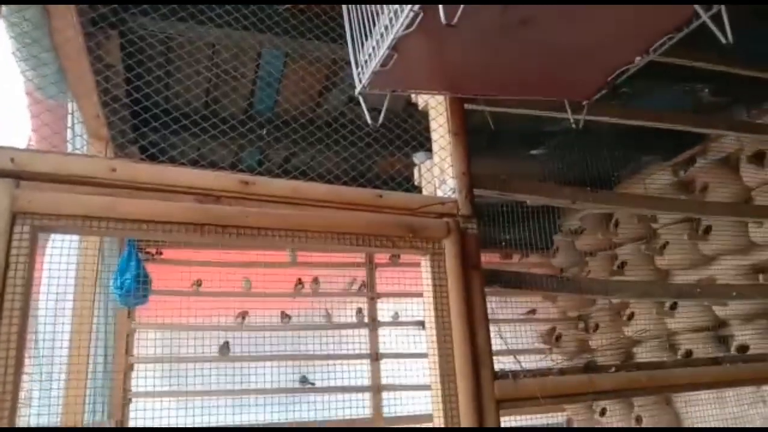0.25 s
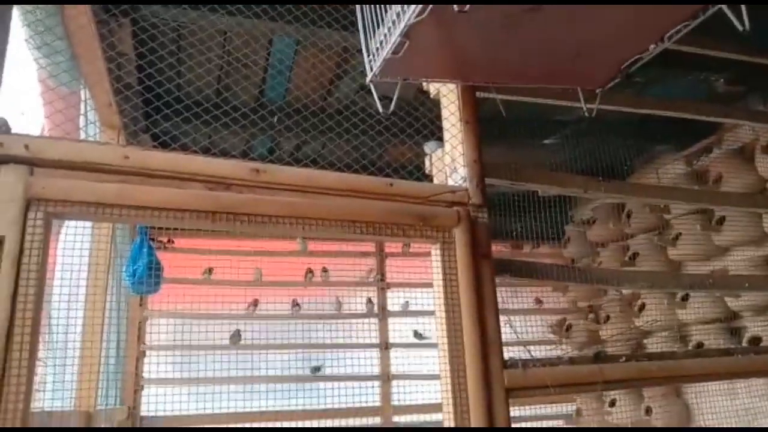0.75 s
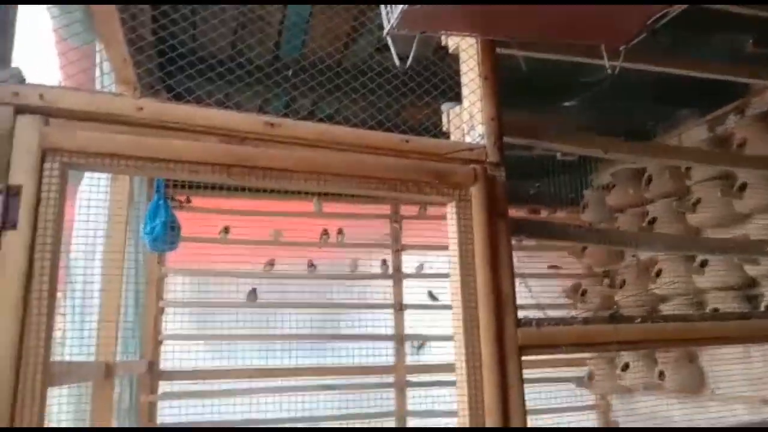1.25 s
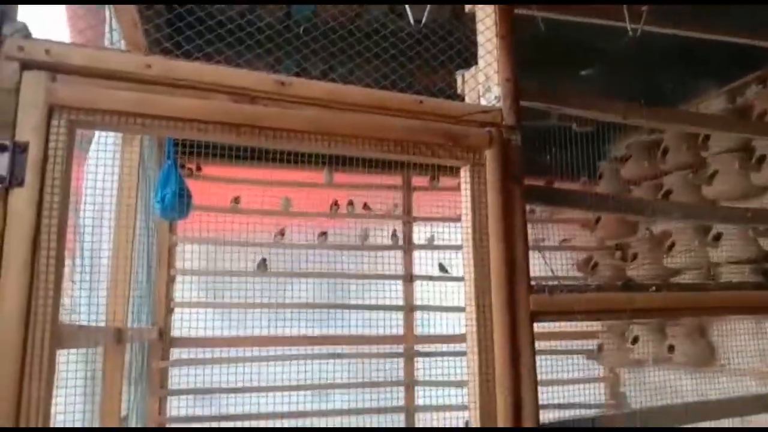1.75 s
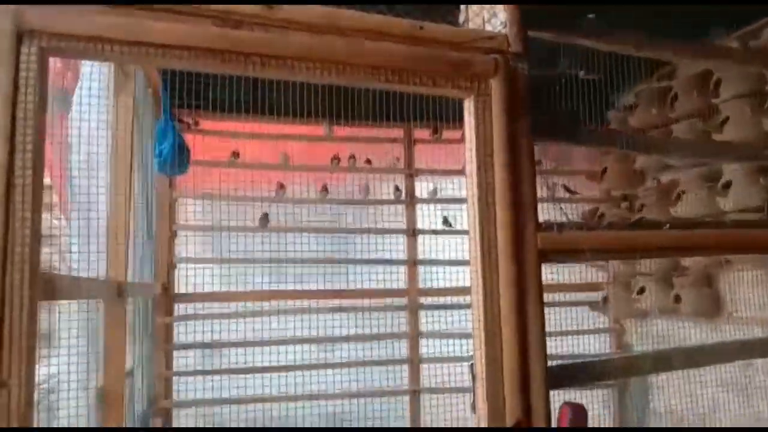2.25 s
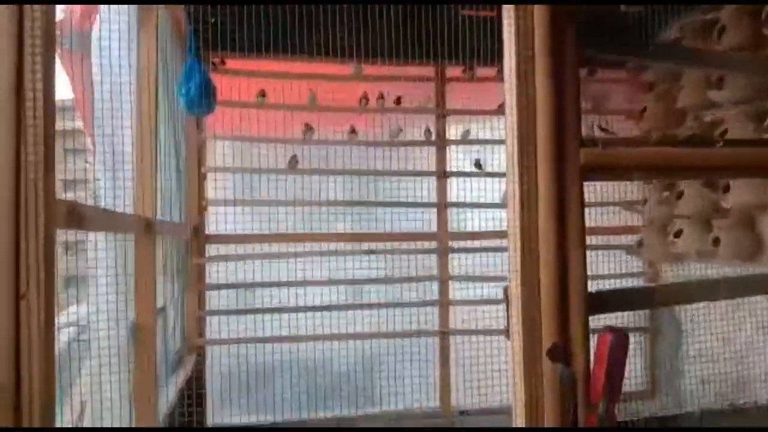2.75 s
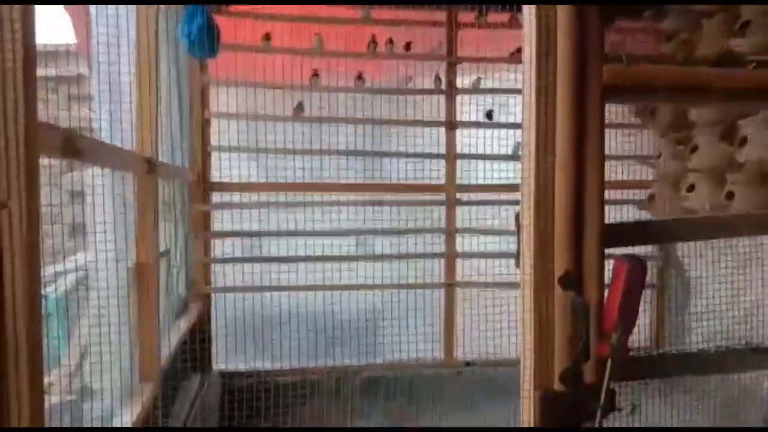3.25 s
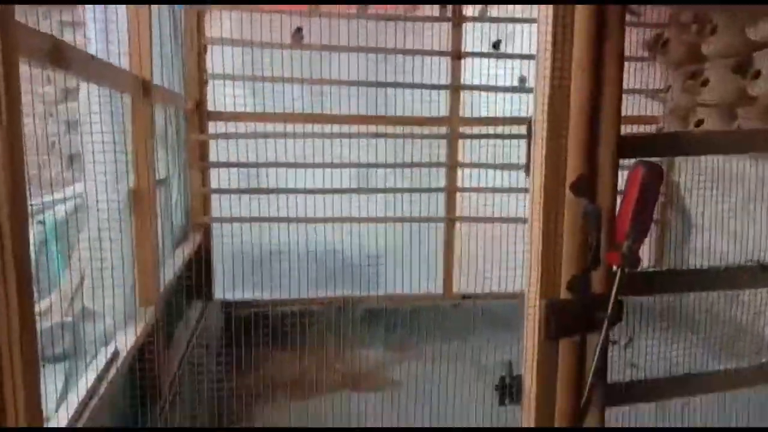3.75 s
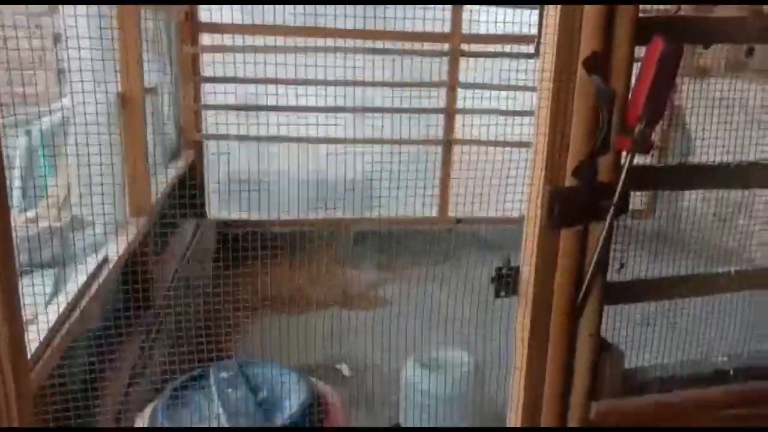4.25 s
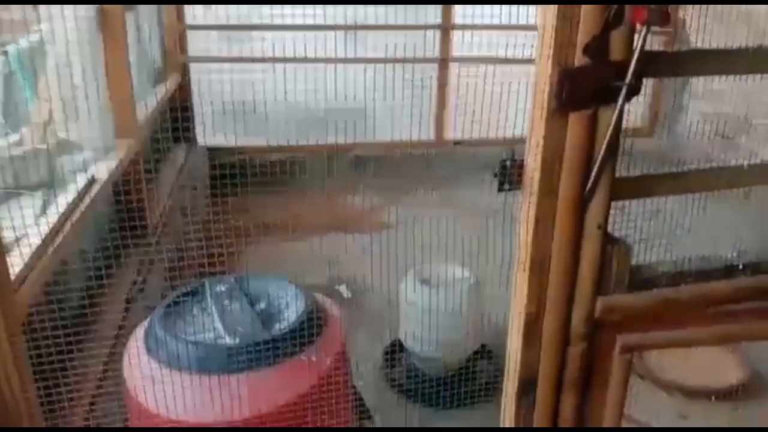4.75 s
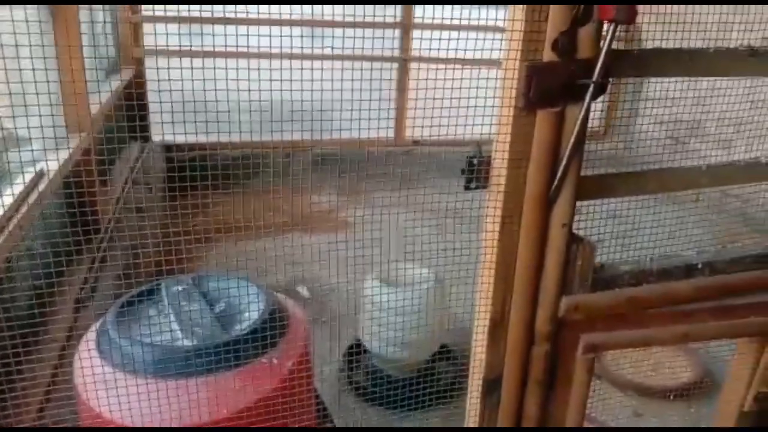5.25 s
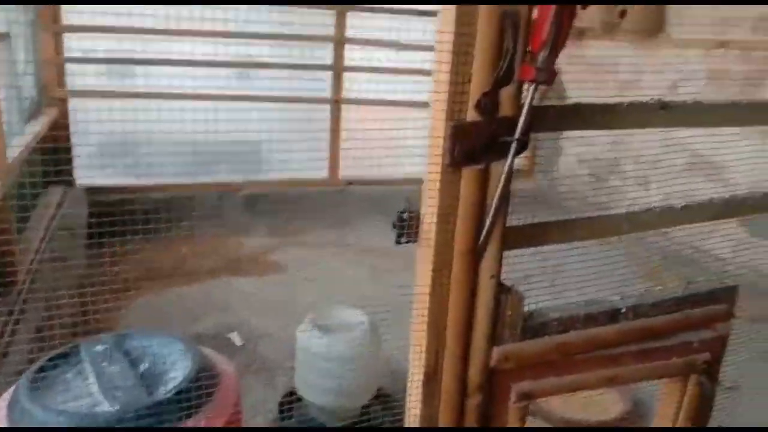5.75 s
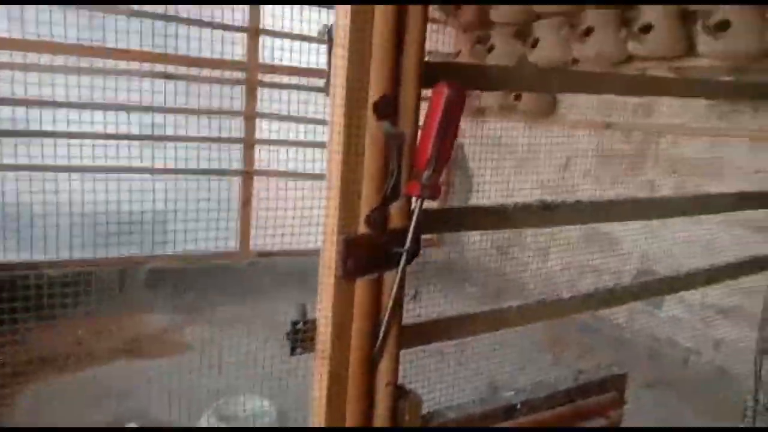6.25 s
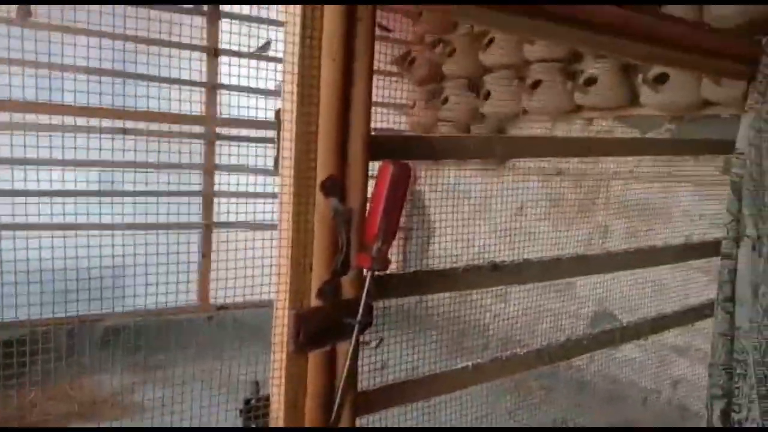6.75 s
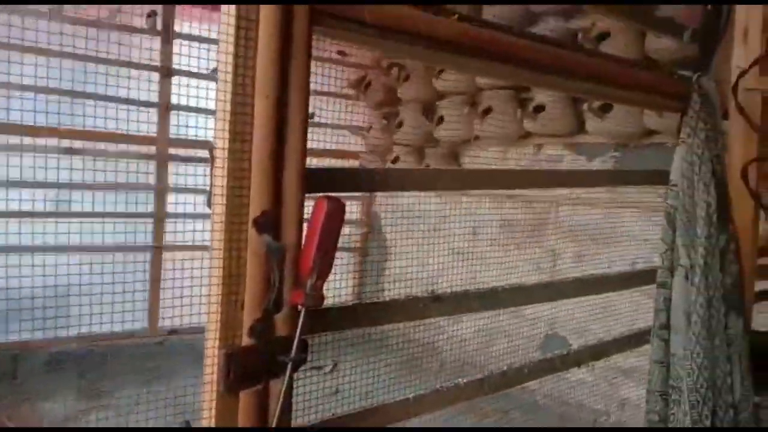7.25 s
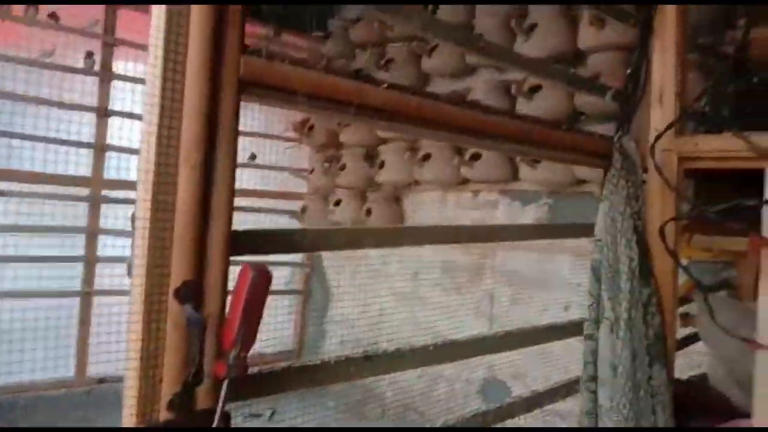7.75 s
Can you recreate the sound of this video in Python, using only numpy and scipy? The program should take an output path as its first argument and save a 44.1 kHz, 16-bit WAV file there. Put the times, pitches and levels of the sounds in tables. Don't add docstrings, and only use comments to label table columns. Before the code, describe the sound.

A flock of small finches calls in a wood-and-wire aviary. Short nasal peeps and rasping chirps come from farther perches, with tiny claw ticks on mesh. After a quiet lull around three to four seconds, nearer birds burst in with loud rasps, arched whistles and clear beeps, staying busy to the end. Low lumpy traffic and building hum lie underneath, heard through a small handheld microphone that thins the treble between calls.

```python
import sys
import numpy as np
from scipy import signal
from scipy.fft import rfft, irfft, next_fast_len
from scipy.io import wavfile
from scipy.ndimage import uniform_filter1d, map_coordinates

SR = 44100
rng = np.random.default_rng(int(sys.argv[2]) if len(sys.argv) > 2 else 0)


def gain_from_db(level_db):
    decades = np.asarray(level_db, float) / 20
    return 10 ** decades


def wav_out(sig):
    wavfile.write(sys.argv[1], SR, np.round(np.clip(np.atleast_2d(sig).T, -1, 1) * 32767).astype(np.int16))


N = 353241


def unit(x):
    return x / np.sqrt(np.mean(x ** 2) + 1e-20)


def along(points, hz):
    f, v = np.transpose(points)
    return np.interp(np.log(hz + 1), np.log(f + 1), v)


def curves(rows):
    s, *cols = np.transpose(rows)
    return [np.interp(np.arange(N) / SR, s, c) for c in cols]


def wobble(rate_hz, size=N):
    knots = rng.standard_normal(int(size * rate_hz / SR) + 4)
    return map_coordinates(knots, [np.arange(size) * rate_hz / SR])


def filtered(x, response):
    m = next_fast_len(x.shape[-1] + 4096)
    return irfft(rfft(x, m) * response(np.fft.rfftfreq(m, 1 / SR)), m)[..., :x.shape[-1]]


def add(track, s, sound):
    start = max(round(s * SR), 0)
    track[start:start + len(sound)] += sound[:len(track) - start]


def patches(x, patchy_db):
    z = signal.stft(x, nperseg=2048)[2]
    field = uniform_filter1d(uniform_filter1d(rng.standard_normal(z.shape), 3, 0), 4, 1)
    return signal.istft(z * gain_from_db(patchy_db * unit(field)), nperseg=2048)[1][:N]


def rush(spectrum, patchy_db):
    x = patches(rng.standard_normal(N), patchy_db)
    return unit(filtered(x, lambda hz: gain_from_db(along([(15, -120)] + spectrum + [(22000, -120)], hz))))


def beak(hz, centre_hz, octaves, skirt_db):
    hump = np.exp(-.5 * (np.log2((hz + 1) / centre_hz) / octaves) ** 2)
    bass_shut = 1 + (1600 / (hz + 1)) ** 6
    top_shut = 1 + (hz / 7000) ** 3.3
    return hump + gain_from_db(skirt_db) / bass_shut / top_shut


def voiced(pitch_hz, centre_hz, octaves, skirt_db, jitter, rough, flicker_db=2.7):
    size = len(pitch_hz)
    order = np.arange(1, 13500 // pitch_hz.max())[:, None]
    cycles = np.cumsum(pitch_hz * (1 + jitter * wobble(149.96, size=size))) / SR
    total = len(order) * size
    knots = gain_from_db(flicker_db * rng.standard_normal(total // 700 + 2))
    flicker = np.interp(np.arange(total) / 700, np.arange(len(knots)), knots).reshape(-1, size)
    strength = beak(order * pitch_hz.mean(), centre_hz, octaves, skirt_db) * flicker
    phase = order * cycles + rng.random(order.shape)
    stack = np.sum(strength * np.sin(2 * np.pi * phase), axis=0)
    return unit(stack * (1 + rough * wobble(850, size=size)) / np.sqrt(1 + rough ** 2))


# t/s, traffic level/dB, building hum level/dB
TOWN_LEVELS = [(0.0, -58, -66), (0.15, -70, -60), (0.24, -50.5, -60), (0.27, -58, -60.5),
               (2.54, -57.5, -58.5), (2.76, -49, -58.5), (2.92, -57.5, -57), (3.4, -56.5, -57.5),
               (3.6, -56.5, -54), (4.77, -62, -62), (4.86, -48, -63), (4.9, -57.5, -59), (6.15, -51.5, -61),
               (6.21, -53, -64), (6.37, -66, -62.5), (6.46, -51.5, -57.5), (7.31, -59, -58),
               (8.0, -57.5, -55)]
# t/s, level/dB
CHORUS_LEVELS = [
    (0, -86.5),
    (.33, -78),
    (3.76, -89.5),
    (4.7, -82.5),
    (5.03, -63.5),
    (5.46, -79),
    (6.4, -74.5),
    (7.1, -76),
    (8, -71.5),
]
# t/s, level over the hiss base/dB
HISS_LEVELS = [
    (0, 4),
    (.7, 8),
    (1.3, 5),
    (2.3, 6),
    (2.9, 2),
    (4.6, 2),
    (5.2, 0.5),
    (7, 2.5),
    (8, 1),
]
# f/Hz, density/dB per Hz
TRAFFIC_SPECTRUM = [(30, -23), (60, -15), (100, 5.5), (140, 5), (185, -7.5), (300, -26)]
HUM_SPECTRUM = [(150, -29.5), (232, 0), (300, -11), (450, -12.5), (650, -20), (1000, -52)]
DRONE_SPECTRUM = [(500, -27.5), (800, -10.5), (1130, -9), (1260, -6), (1400, -12.5), (1900, -17),
                  (2600, -20.5), (4000, -51)]
CHORUS_SPECTRUM = [(1500, -18), (2500, 7.5), (4000, 6.5), (7000, 15.5), (9000, 5), (12000, -9)]
SELF_SPECTRUM = [(8000, -4), (10000, -3.5), (15500, -11.5)]
DRONE_DB, DRONE_FOLLOWS = -62, 0.25
SELF_DB = -66


def town():
    traffic_db, hum_db = curves(TOWN_LEVELS)
    chorus_db, = curves(CHORUS_LEVELS)
    hiss_db, = curves(HISS_LEVELS)
    drone_db = DRONE_DB + DRONE_FOLLOWS * (chorus_db - chorus_db.mean())
    traffic = gain_from_db(traffic_db + 2.1 * wobble(17)) * rush(TRAFFIC_SPECTRUM, patchy_db=3.1)
    hum = gain_from_db(hum_db) * rush(HUM_SPECTRUM, patchy_db=4.2)
    drone = gain_from_db(drone_db - 3 + 2.6 * wobble(22)) * rush(DRONE_SPECTRUM, patchy_db=3.6)
    hiss = gain_from_db(SELF_DB + hiss_db + 1.2 * wobble(11)) * rush(SELF_SPECTRUM, patchy_db=7.0)
    chorus = gain_from_db(chorus_db + 19 + 2.6 * wobble(9)) * rush(CHORUS_SPECTRUM, patchy_db=4.5)
    return traffic + hum + drone + hiss + chorus


# t/s, length/s, first f/Hz, last f/Hz, level/dB
LOW_NOTES = [(0.204, .12, 523, 596, -46), (0.293, 0.072, 506, 530.6, -47), (0.63, 0.099, 518, 555, -48.5),
             (1.091, 0.097, 508, 476, -63), (1.235, 0.06, 482, 459, -57), (1.511, 0.043, 499, 478, -60),
             (1.879, 0.074, 514, 491, -53.5), (1.944, 0.083, 519, 523, -54),
             (4.056, 0.08, 494.6, 507, -58.5), (4.428, 0.061, 516, 524, -54), (5.712, 0.095, 469, 511, -59),
             (5.749, 0.0473, 532, 543, -54), (5.795, .13, 513.6, 484, -49.5),
             (6.69, 0.071, 540, 528, -48.5), (7.055, 0.024, 498, 503, -58.5), (7.957, 0.073, 457, 465, -54),
             (3.845, 0.076, 544, 510, -62)]
HIGH_NOTES = [(0, 0.042, 623, 610, -55.5), (0.054, 0.092, 604, 570, -51.5), (0.146, 0.096, 611, 592, -51.5),
              (0.911, 0.064, 564, 577, -59), (1.393, 0.15, 571, 543, -68), (1.608, 0.03, 567, 569, -52.5),
              (1.824, 0.049, 603, 564, -70), (2.446, 0.069, 561, 485.6, -50), (4.077, 0.1, 586, 547, -54.5),
              (4.214, 0.13, 721, 558, -47.5), (4.576, 0.072, 587, 550, -55.5),
              (5.345, 0.099, 591, 625, -48.5), (5.432, 0.065, 567, 542, -56),
              (6.227, 0.091, 617, 593, -50.5), (6.419, 0.052, 635, 680, -54.5),
              (6.93, 0.073, 564, 544, -55), (7.114, 0.061, 687, 716, -51.5), (7.236, 0.04, 574, 572, -52),
              (7.508, 0.058, 588, 537, -50.5), (7.613, 0.081, 569, 514, -54)]
# t/s, length/s, first f/Hz, last f/Hz, level/dB
RISERS = [
    (4.765, .045, 1066, 1194, -46.5),
    (4.926, 0.051, 1060, 1188, -43.5),
    (6.615, 0.0578, 587, 602, -53),
]
# t/s, length/s, f/Hz, level/dB,
# strongest partial
FLAT_NOTES = [(0.469, 0.141, 560, -63.5, 2.26), (0.509, 0.113, 712, -71, 0.74), (1.23, 0.064, 702, -63, 0.48),
              (3.132, 0.067, 495.5, -59, 4.8), (3.378, 0.066, 439, -65, 3.6), (3.581, 0.0843, 483, -61, 4.5),
              (4.8, 0.06, 990, -61.5, 11), (5.005, 0.06, 574, -47, 4), (0.079, 0.147, 599, -68.5, 1.5),
              (1.835, 0.031, 590, -54, 11), (7.84, 0.09, 650, -62, 1.2), (5.3, 0.0443, 720, -44, 6.3),
              (6.05, 0.0475, 570, -51, 4.9), (6.2, .022, 560, -45, 8.4), (7.895, 0.06, 540, -48, 5.8),
              (7.2, 0.069, 1200, -63, 1.43), (2.785, 0.035, 1290, -68, 0.8), (7.74, 0.05, 540, -55.5, 4),
              (4.31, 0.017, 1300, -57.5, 0.89)]
LOW_PARTIAL, HIGH_PARTIAL, RISER_PARTIAL = 6.41, 5.5, 3.56
FLAT_SAG = 0.0309


def stacks():
    out = np.zeros(N)
    notes = [(*row, LOW_PARTIAL) for row in LOW_NOTES]
    notes += [(*row, HIGH_PARTIAL) for row in HIGH_NOTES]
    notes += [(*row, RISER_PARTIAL) for row in RISERS]
    for s, length, hz, db, partial in FLAT_NOTES:
        notes.append((s, length, hz, hz * (1 - FLAT_SAG), db, partial))
    for s, length, first_hz, last_hz, db, partial in notes:
        beak_hz = partial * (first_hz + last_hz) / 2
        u = np.linspace(0, 1.25, round(1.25 * length * SR))
        glide_hz = first_hz + (last_hz - first_hz) * u
        pitch_hz = glide_hz * (1 - 0.044 * np.exp(-u / 0.083) - 0.0145 * u ** 4)
        swell = np.abs(np.sin(np.pi * (u / 1.144) ** 0.8)) ** 1.3
        voice = voiced(pitch_hz, beak_hz, octaves=.6, skirt_db=-24, jitter=.006, rough=.32, flicker_db=4.6)
        add(out, s, gain_from_db(db + 6.0) * swell * voice)
    return out


DISTANT_COUNT, DISTANT_DB, DISTANT_BEAK_HZ = 44, -67, 1500


def distant():
    out = np.zeros(N)
    for when, long, pitch, glide, loud in rng.random((DISTANT_COUNT, 5)):
        u = np.linspace(0, 1, round((.04 + .08 * long) * SR))
        pitch_hz = (430 + 250 * pitch) * (1 + (.24 * glide - .12) * u)
        voice = voiced(pitch_hz, DISTANT_BEAK_HZ, octaves=.3, skirt_db=-30, jitter=.008, rough=.4,
                       flicker_db=5)
        add(out, when * N / SR, gain_from_db(DISTANT_DB + 8 * loud) * np.sin(np.pi * u) * voice)
    return out


# peak t/s, rise/s, fall/s, level/dB
FAR_RASPS = [(0.144, 0.049, 0.07, -47.5), (0.26, 0.04, 0.094, -49), (.357, 0.032, 0.03, -44),
             (.581, 0.019, 0.043, -40.5), (0.796, 0.032, 0.015, -41), (.947, 0.071, 0.022, -44),
             (1.395, 0.082, 0.056, -45.5), (1.546, 0.051, 0.016, -44), (1.607, 0.024, 0.078, -51.5),
             (1.741, 0.015, 0.036, -45), (1.868, 0.021, 0.058, -41.5), (2.007, .023, 0.022, -35.5),
             (2.16, 0.029, 0.013, -32), (2.341, 0.021, 0.014, -34.5), (2.449, 0.0053, 0.019, -45.5),
             (2.48, 0.024, 0.04, -41.5), (2.798, 0.011, 0.021, -71), (2.932, 0.02, 0.011, -60),
             (3.199, 0.017, 0.017, -79), (3.542, 0.015, 0.072, -50.5), (3.759, .044, 0.027, -55),
             (4.349, 0.038, 0.01, -46.5), (4.467, 0.06, 0.016, -48.5), (4.579, 0.012, 0.016, -47),
             (4.664, 0.027, 0.021, -47), (5.345, 0.093, 0.038, -38.5), (6.676, 0.025, 0.025, -37.5),
             (6.887, 0.021, 0.06, -35), (7.609, 0.048, 0.066, -40.5), (7.951, 0.04, 0.13, -62)]
# peak t/s, rise/s, fall/s, level/dB, beak f/Hz
NEAR_RASPS = [(4.813, 0.018, 0.035, -28, 4660), (4.859, 0.033, 0.018, -34, 4150),
              (4.975, 0.023, 0.033, -26, 5030), (5.053, 0.023, 0.027, -30, 4230),
              (5.132, 0.0082, 0.013, -29, 4700), (5.172, 0.0074, 0.046, -31, 3970),
              (5.504, 0.016, 0.053, -38.5, 4460), (5.619, 0.0083, 0.012, -33.5, 4970),
              (5.67, 0.037, .023, -34, 5050), (5.772, 0.026, 0.017, -47, 4000),
              (5.974, 0.032, 0.053, -37.5, 4260), (5.999, 0.03, 0.071, -40.5, 3300),
              (6.123, 0.01, 0.022, -34.5, 4830), (6.197, 0.03, 0.061, -29.5, 4730),
              (6.438, 0.029, 0.022, -43, 4250), (6.571, .036, 0.028, -34.5, 4620),
              (7.061, 0.019, 0.024, -47, 4700), (7.135, 0.011, 0.095, -36.5, 4800),
              (7.258, 0.061, 0.011, -41, 4530), (7.358, 0.031, 0.057, -40, 4300),
              (7.501, 0.02, 0.017, -34, 4930), (7.745, 0.048, 0.033, -36.5, 5030),
              (7.867, 0.029, 0.037, -34, 4820)]
# peak t/s, rise/s, fall/s, level/dB, beak f/Hz
SQUEAKS = [
    (0.458, .005, .025, -56, 6840),
    (1.071, 0.017, 0.073, -56, 5770),
    (1.696, 0.011, .033, -47, 5700),
    (2.125, 0.0064, .007, -42, 5100),
    (2.243, 0.021, .043, -45, 6100),
    (2.699, .052, 0.038, -61, 5960),
    (2.81, .015, .02, -60, 5950),
    (3.545, .015, 0.028, -46, 7100),
    (4.773, .004, 0.012, -36, 5250),
]
FAR_BEAK_HZ, NEAR_OCTAVES, SQUEAK_OCTAVES = 3740, 0.31, 0.17
FAR_OCTAVES, NARROWS = 0.78, 0.03


def rasps():
    out = np.zeros(N)
    calls = []
    for row in FAR_RASPS:
        octaves = FAR_OCTAVES * np.clip(1 - NARROWS * (row[3] + 45), .5, 1.3)
        calls.append((*row, FAR_BEAK_HZ, octaves))
    calls += [(*row, NEAR_OCTAVES) for row in NEAR_RASPS]
    calls += [(*row, SQUEAK_OCTAVES) for row in SQUEAKS]
    for s, rise, fall, db, beak_hz, octaves in calls:
        t = np.arange(-round(1.8 * rise * SR), round(3 * fall * SR)) / SR
        pitch_hz = rng.uniform(500, 900) * (1 - .8 * t)
        shaky = voiced(pitch_hz, beak_hz, 1.2 * octaves, skirt_db=-20, jitter=.022, rough=.55)
        flow = gain_from_db(0.56 * wobble(506, size=len(t))) * rng.standard_normal(len(t))
        hoarse = unit(filtered(flow, lambda hz: beak(hz, beak_hz, octaves, skirt_db=-16)))
        voice = gain_from_db(-1.2) * shaky + gain_from_db(-7) * hoarse
        swell = gain_from_db(-9 * np.where(t < 0, np.abs(t / rise) ** 1.7, np.abs(t / fall) ** 1.38))
        add(out, s + t[0], gain_from_db(db - 0.5) * swell * voice)
    return out


# t/s, peak level/dB, frame knock level/dB, mesh rattle level/dB
TICKS = [(0.452, -74, -14, 15.5), (0.497, -79.5, -18, 17), (0.572, -77, -4, 14), (0.6567, -65, -9, -4),
         (1.063, -69.5, -1, 7), (1.11, -71, -4, -11), (1.5972, -66.5, 5, 9.5), (1.695, -57, 4, -2),
         (1.7342, -51.5, -9, -14), (1.771, -51.5, -7, -3), (2.0804, -67.5, 4, 1), (2.122, -71.5, 16, 13.5),
         (2.16, -60.5, 7, 3.5), (2.2379, -57, -3.5, -7), (2.2796, -61, 5.5, -11), (2.5572, -72.5, -14, 5.5),
         (2.445, -79, 13, 4), (1.905, -74, -5, 2), (2.958, -85, 15, 18), (2.991, -60.5, 8, 6.5),
         (3.52, -76, 12, 7), (2.793, -82, 7, 12), (3.9823, -85.5, -7, 10.5), (4.042, -90.5, -11, 15.5),
         (4.571, -69, 2, 1), (5.225, -69, -2, 9), (4.896, -74, -5, 9)]
WIRE_HZ = [5700, 6200, 7130]
WIRE_DB = -2


def ticks():
    out = np.zeros(N)
    t = np.arange(SR // 8) / SR
    for s, db, knock_db, rattle_db in TICKS:
        a, b, c = rng.standard_normal((3, len(t))) * gain_from_db(2.3 * wobble(335, size=len(t)))
        snap = unit(filtered(a, lambda hz: beak(hz, 8600, 0.59, skirt_db=-30)))
        snap *= gain_from_db(22.5 - 60 * t / 0.078)
        rattle = unit(filtered(b, lambda hz: beak(hz, 7300, 0.28, skirt_db=-51.0)))
        rattle *= gain_from_db(rattle_db + 21.0 - 60 * t / 0.091)
        ring = np.sin(2 * np.pi * np.outer(WIRE_HZ, t)).T @ gain_from_db(rng.normal(0, 5.5, len(WIRE_HZ)))
        rattle += ring * gain_from_db(rattle_db + 13.5 + WIRE_DB - 60 * t / 0.045)
        knock = unit(filtered(c, lambda hz: beak(hz, 1520, 0.83, skirt_db=-57)))
        knock *= gain_from_db(knock_db + 7.0 - 60 * t / 0.11)
        onset = 1 - np.exp(-t / .0006)
        add(out, s, gain_from_db(db) * (snap + rattle + knock) * onset)
    return out


# t/s, length/s, top f/Hz, level/dB, strongest partial
ARCHES = [(0.803, 0.076, 1110, -53.5, 2.45), (1.297, 0.0626, 1041, -47, 3.6),
          (4.912, 0.0423, 1028, -41.5, 4.5), (5.003, 0.0495, 954, -38, 4.7), (5.122, 0.067, 975, -35, 4.4),
          (5.603, 0.075, 972, -39, 4.5), (5.907, 0.0606, 1027, -35, 3.92), (6.141, 0.044, 887, -39.5, 3.73),
          (6.498, 0.077, 1015, -36.5, 4.4), (6.82, 0.0733, 982, -36.5, 4.64),
          (7.119, 0.0226, 1084, -42.5, 4.4), (7.203, 0.063, 745, -46.5, 3.3),
          (7.426, 0.0746, 976, -36, 4.84), (7.681, 0.08, 998, -37, 4.97), (7.807, 0.084, 1042, -35.5, 4.55)]
# t/s, length/s, f/Hz, level/dB, strongest partial
BEEPS = [
    (4.893, 0.061, 1274, -48, 2.34),
    (5.483, 0.031, 1365, -41, 4.3),
    (5.838, 0.045, 1266, -46.5, 2.5),
    (6.276, 0.047, 1232, -48.5, 3.26),
    (6.765, 0.054, 1240, -50.5, 3.35),
    (6.8, 0.036, 1024, -53, 3),
    (6.37, 0.051, 1327, -39.5, 3.66),
    (7.147, 0.099, 1367, -47, 4.16),
    (7.297, 0.058, 1332, -38.5, 4.06),
]
ARCH_RISE, ARCH_SAG, BEEP_BEND = .1, .06, .12
HOARSE_UNTIL, HOARSE_DB = -.5, -5


def arches():
    out = np.zeros(N)
    calls = [(*row, 1) for row in ARCHES] + [(*row, BEEP_BEND) for row in BEEPS]
    for s, length, top_hz, db, partial, depth in calls:
        u = np.linspace(-1, 1.2, round(1.1 * length * SR))
        scoop = ARCH_RISE * (1 - np.exp(-(u / .45) ** 2))
        bend = depth * np.where(u < 0, scoop, ARCH_SAG * u * u)
        body = .35 + .65 * np.abs(1 - (u / 1.2) ** 2) ** 1.8
        swell = np.minimum(2.4 * (1 + u), 1) * body * np.minimum(2 * (1.2 - u), 1)
        rough = .2 + 1.4 * np.abs(u) ** 2.6
        voice = voiced(top_hz * (1 - bend), partial * top_hz, octaves=0.14 + 0.2 * depth,
                       skirt_db=-15.5 + 6.4 * depth, jitter=0.0055, rough=rough)
        noise = rng.standard_normal(len(u))
        breath = unit(filtered(noise, lambda hz: beak(hz, 4400, .4, skirt_db=-22)))
        hoarse = depth / (1 + np.exp((u - HOARSE_UNTIL) / .1))
        call = (1 - hoarse) * voice + gain_from_db(HOARSE_DB) * hoarse * breath
        add(out, s, gain_from_db(db + 6.0) * swell * call)
    return out


# f/Hz, t60/s
WALL_DECAY = [(500, 0.25), (4000, 0.15), (10000, 0.0041)]


def shed(x):
    hz, t, z = signal.stft(rng.standard_normal(SR // 3), SR, nperseg=256)
    decay = gain_from_db(-60 * t / along(WALL_DECAY, hz)[:, None])
    tail = signal.istft(z * decay, SR, nperseg=256)[1]
    return signal.fftconvolve(np.pad(x, (200, 0)), tail / np.linalg.norm(tail))[:N]


# f/Hz, side level below middle/dB
SIDE_SPECTRUM = [(30, -24), (80, -42), (250, -32), (1000, -30), (2500, -40), (5000, -44), (9000, -19),
                 (14000, -14)]


def scene():
    wall_db, back_db = -11, 4
    background = town()
    far = stacks() + distant()
    near = rasps() + ticks() + arches()
    mid = near + far + gain_from_db(wall_db) * shed(near + gain_from_db(back_db) * far) + background
    smear = patches(shed(mid), patchy_db=7.5) * gain_from_db(4.0 * wobble(14) - 3.0)
    side = filtered(smear, lambda hz: gain_from_db(along(SIDE_SPECTRUM, hz)))
    return np.array([mid + side, mid - side])


QUIET_DB, DUCK, DUCK_MAX_DB = -9, 0.29, -11


def suppressed(x):
    treble = filtered(x, lambda hz: 1 / (1 + (2400 / (hz + 1)) ** 4))
    power = treble.mean(0) ** 2
    now, recent = (np.abs(uniform_filter1d(power, round(s * SR))) + 1e-14 for s in (.02, .35))
    over_db = 10 * np.log10(now / recent) - QUIET_DB
    duck_db = np.clip(DUCK * over_db, DUCK_MAX_DB, 0)
    return x + (gain_from_db(duck_db) - 1) * treble


def top_cut(x):
    return signal.sosfilt(signal.butter(12, 16260, fs=SR, output="sos"), x)


# f/Hz, level/dB
MIC_COLOUR = [(1050, 1), (1260, 11), (1550, 1.5), (2000, 3), (2600, -3), (5300, -1), (6250, -6.5),
              (6620, -11.5), (7100, -5.5), (8500, -21), (13400, -21), (15100, -3.5), (15700, -4)]
TOP_HZ = 15750


def record(dry):
    x = filtered(dry, lambda hz: gain_from_db(along(MIC_COLOUR, hz)) * (hz < TOP_HZ))
    return top_cut(suppressed(x))


dry = scene()
out = record(dry)
wav_out(out)
```